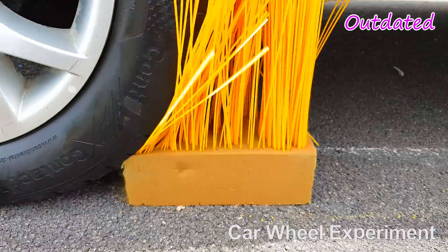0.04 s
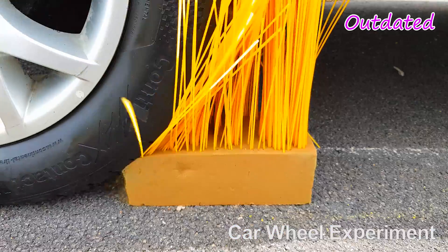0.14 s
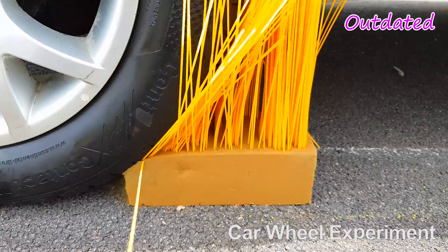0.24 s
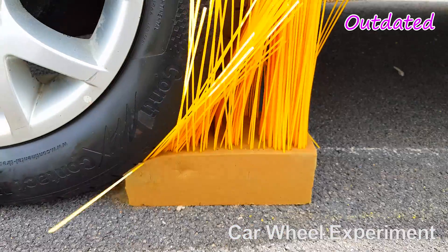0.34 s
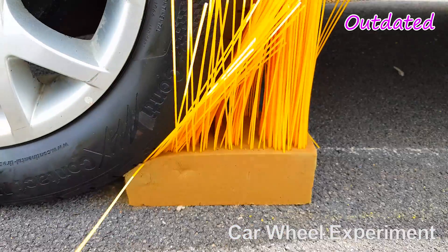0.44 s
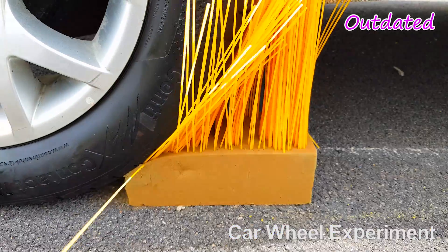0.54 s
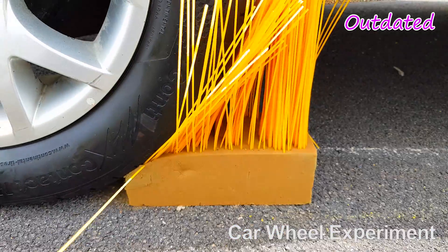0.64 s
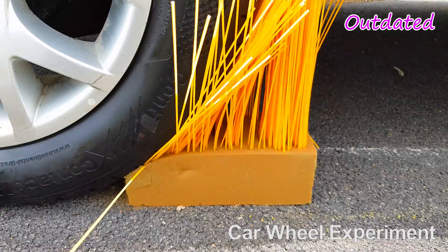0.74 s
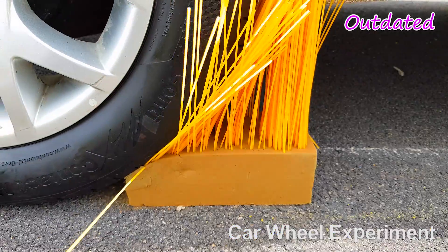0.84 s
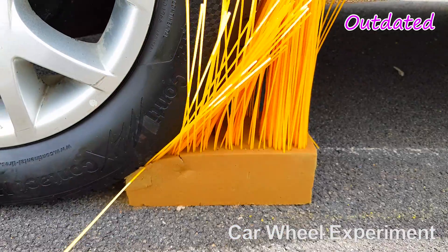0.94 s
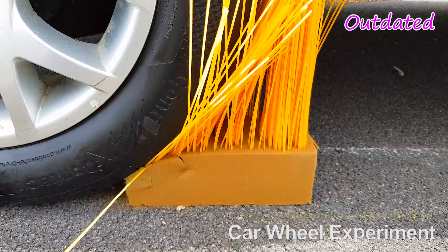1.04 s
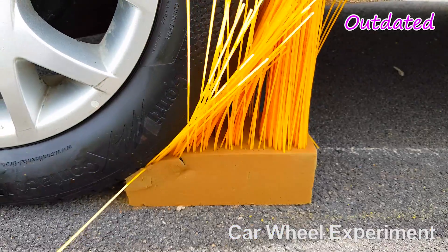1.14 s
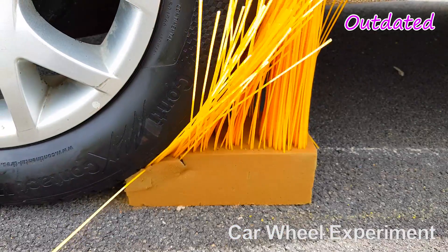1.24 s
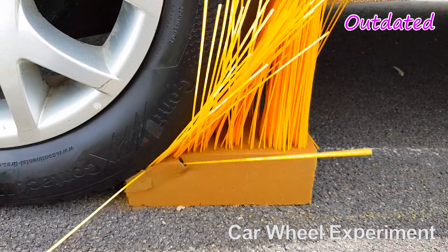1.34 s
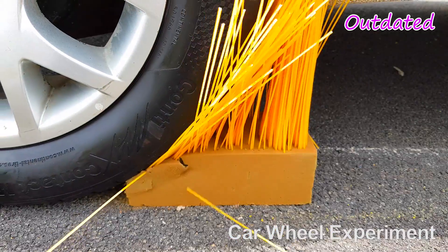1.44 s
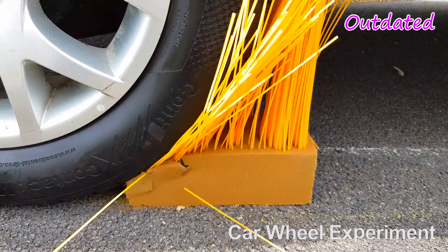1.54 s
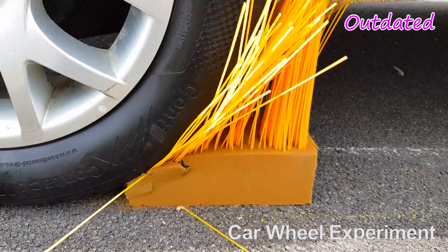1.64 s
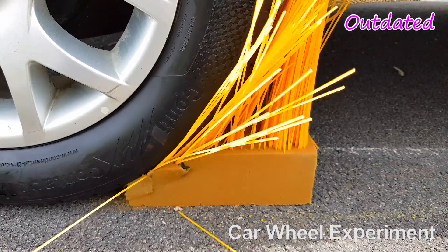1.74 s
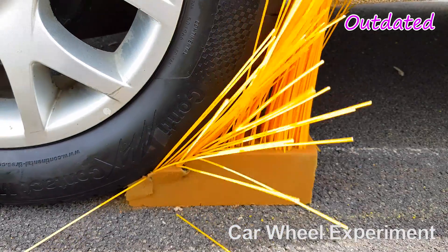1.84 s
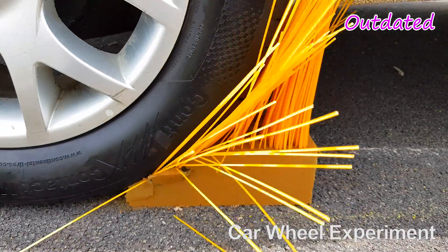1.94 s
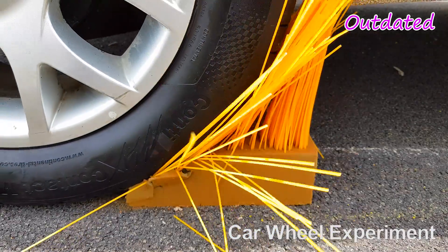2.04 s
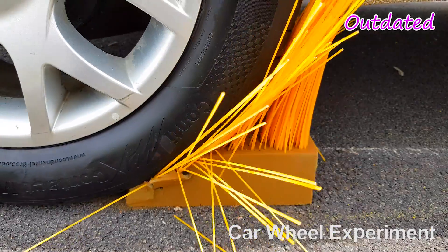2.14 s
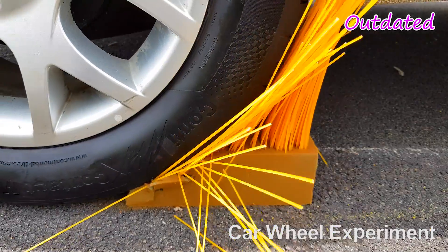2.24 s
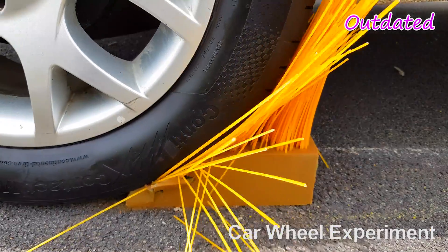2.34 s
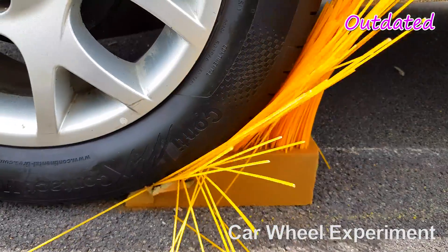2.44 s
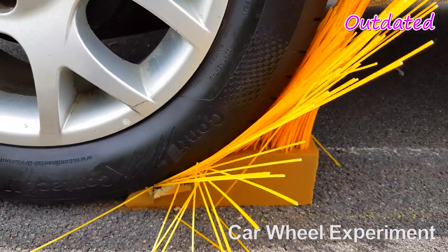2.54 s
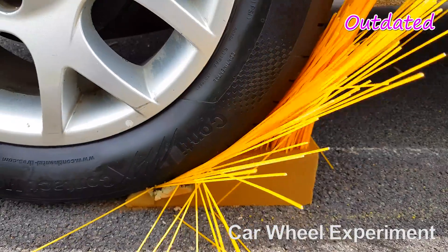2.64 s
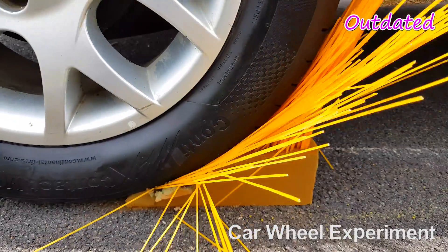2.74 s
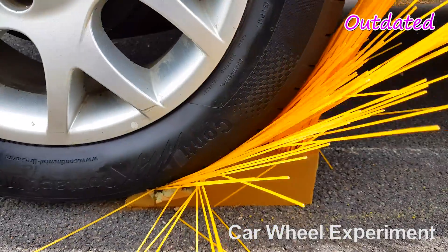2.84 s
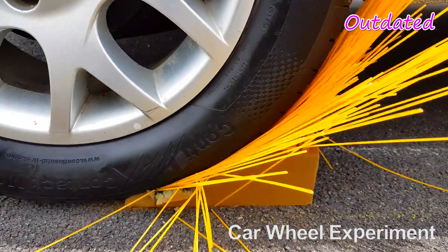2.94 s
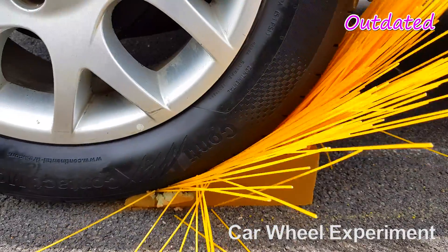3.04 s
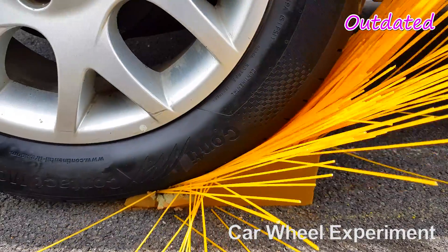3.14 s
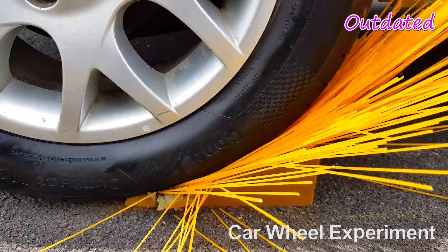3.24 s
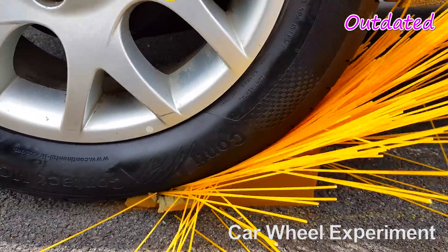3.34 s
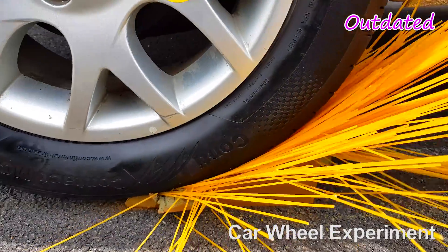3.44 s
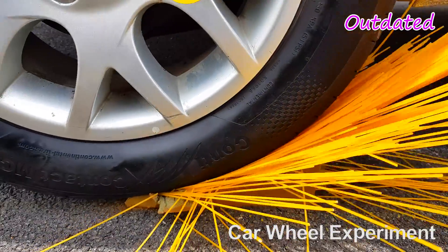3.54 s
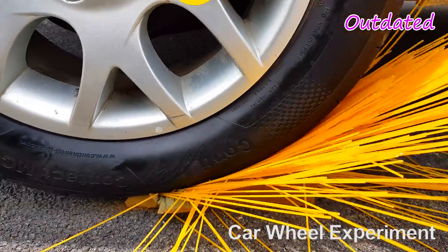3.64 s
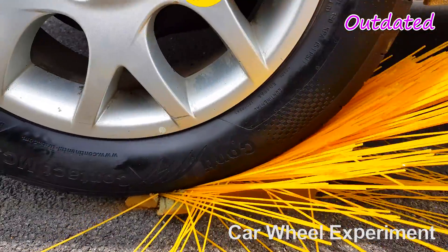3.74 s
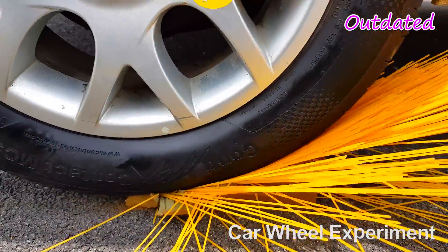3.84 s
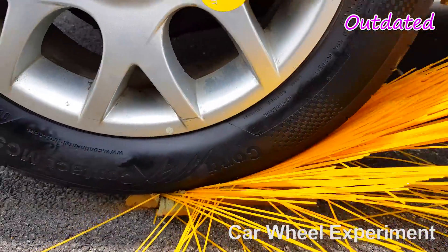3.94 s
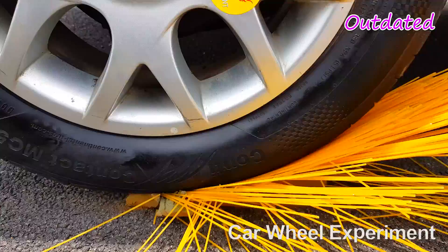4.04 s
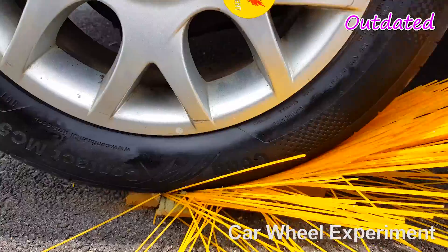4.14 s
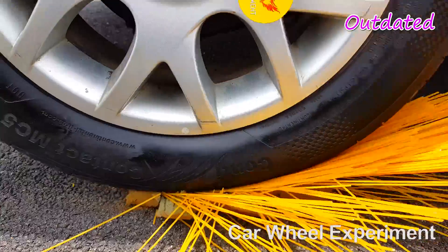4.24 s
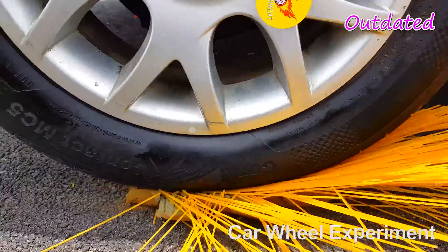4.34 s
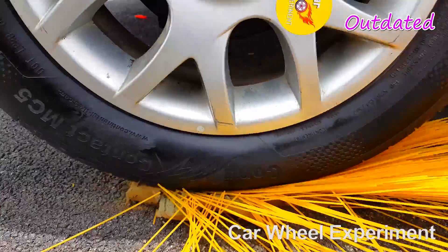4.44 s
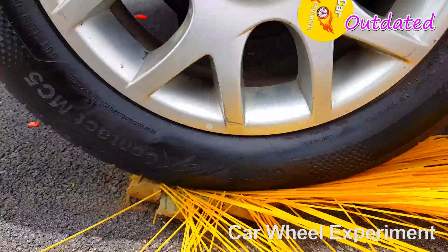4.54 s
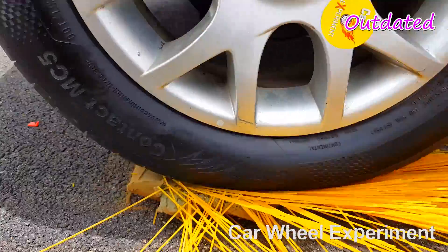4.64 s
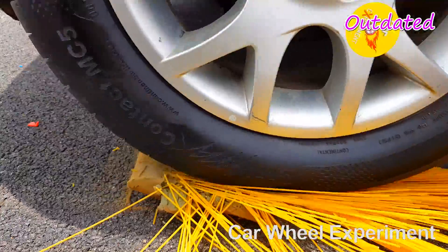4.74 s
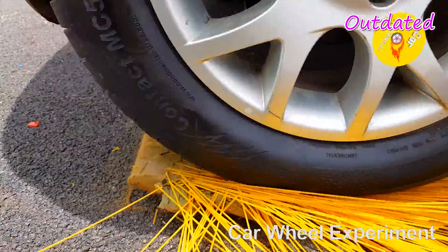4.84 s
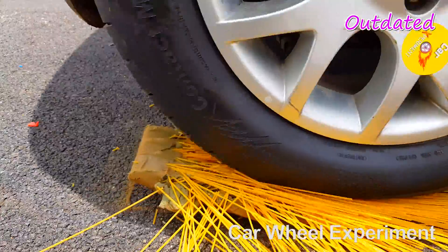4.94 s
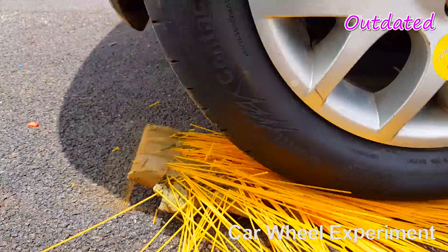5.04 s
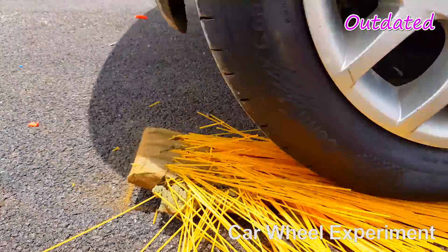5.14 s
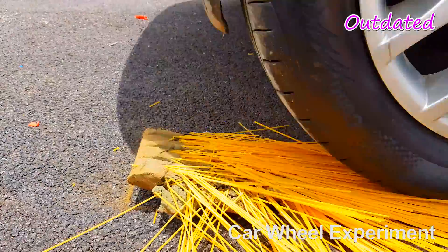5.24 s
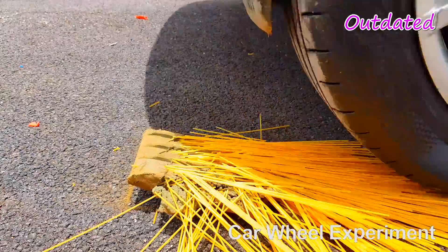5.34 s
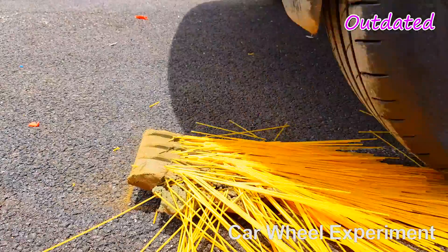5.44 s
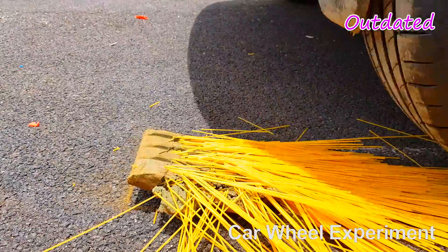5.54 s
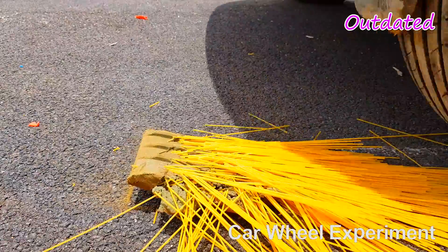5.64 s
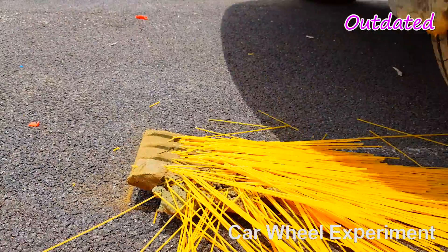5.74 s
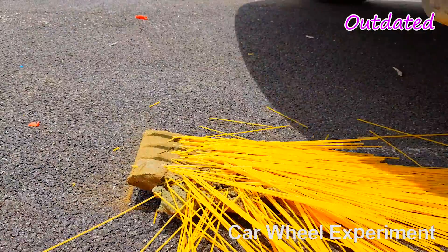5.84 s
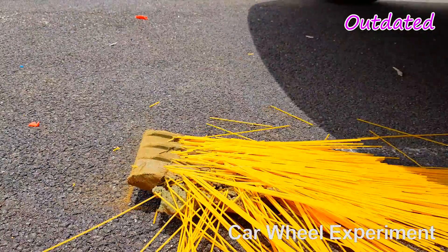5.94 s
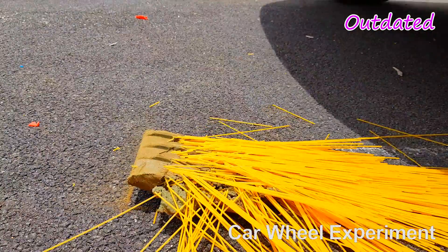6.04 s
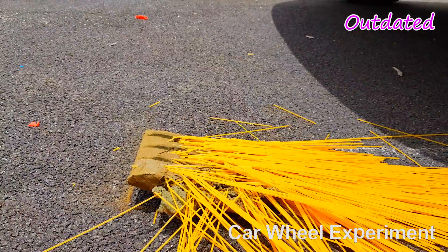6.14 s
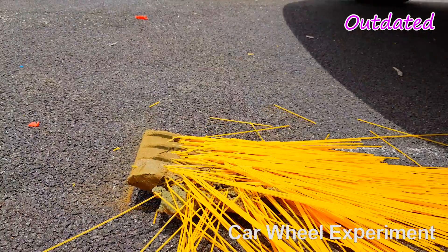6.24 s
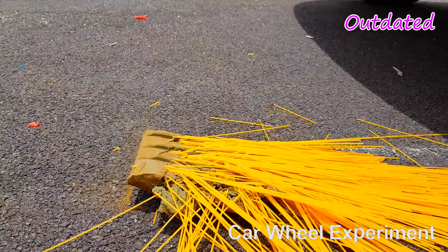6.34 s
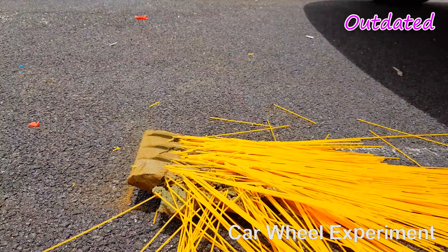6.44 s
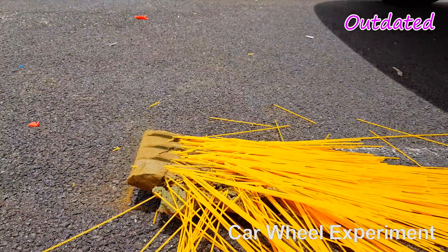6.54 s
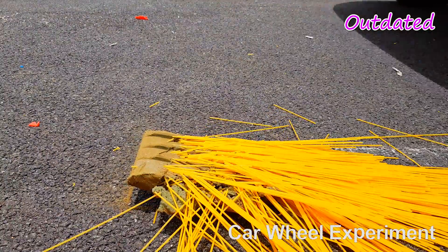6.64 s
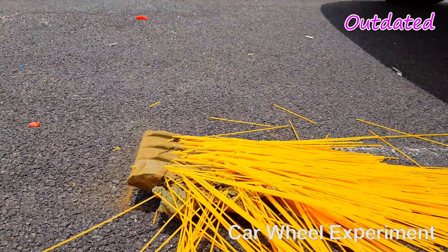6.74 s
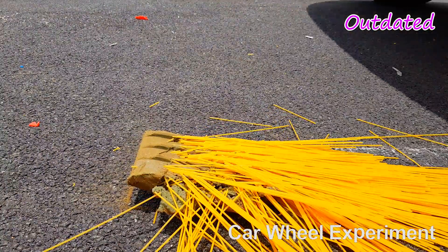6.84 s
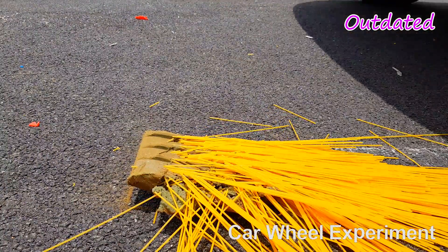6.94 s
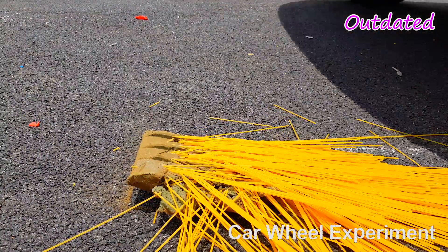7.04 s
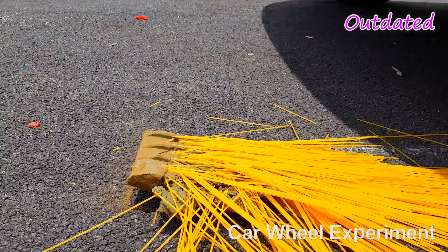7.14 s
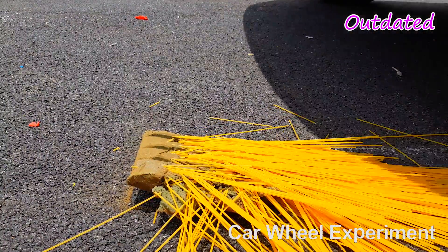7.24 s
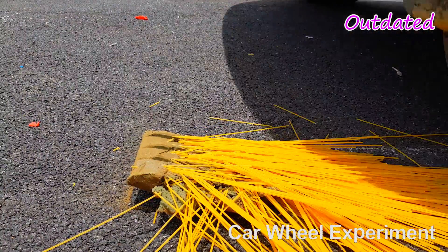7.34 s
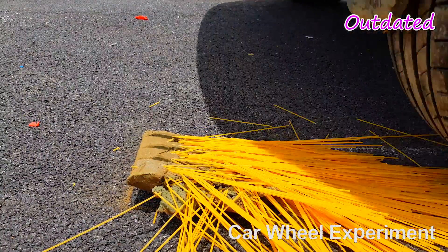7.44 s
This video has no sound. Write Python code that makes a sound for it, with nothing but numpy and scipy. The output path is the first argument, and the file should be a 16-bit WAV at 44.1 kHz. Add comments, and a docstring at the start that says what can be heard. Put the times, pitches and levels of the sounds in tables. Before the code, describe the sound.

Dry spaghetti stuck in a foam block breaks under a slowly rolling car tyre, close to the microphone on outdoor asphalt. Sharp single snaps stand out over a dense crackle for about five seconds. The foam then collapses in a quick cluster of dull crunches and thuds. Afterwards a faint idling engine and tyre hiss fade nearly to silence, with light wind puffs, then return with soft grinding and a few grit ticks.

```python
"""Dry spaghetti stuck in a foam block snaps under a slowly rolling car tyre, on asphalt near the microphone.
Single sticks crack and ring over a dense crackle of tiny fractures. The foam crunches and thuds
as it is flattened, and the tyre rolls off. Behind it the engine idles and the tread hisses; the car
sound drops to near silence, then comes back abruptly with grinding and grit ticks. A low fluttering
drone starts abruptly and fades, twice. Light wind puffs on the two microphone ports."""
import sys
import numpy as np
from scipy import signal
from scipy.fft import rfft, irfft, next_fast_len
from scipy.io import wavfile
from scipy.ndimage import uniform_filter1d, map_coordinates

SR = 44100
rng = np.random.default_rng(int(sys.argv[2]) if len(sys.argv) > 2 else 0)


def file_out(sig):
    """Save sig as 16-bit WAV at sys.argv[1]."""
    # one column per channel
    cols = np.atleast_2d(sig).T
    # limit, then scale
    lim = np.clip(cols, -1, 1)
    pcm = np.round(lim * 32767).astype(np.int16)
    wavfile.write(sys.argv[1], SR, pcm)


N = 329868
TIME = np.arange(N) / SR
ROLL_OFF_S = 5.286  # tyre leaves the block
RESUME_S, RESUME_RISE_S = 6.71, 0.023  # car sound comes back abruptly


def amp(db):
    """Decibels to gain."""
    return np.exp(np.asarray(db) * (np.log(10) / 20))


def unit(x):
    """Scale to rms 1."""
    return x / np.sqrt(np.mean(x ** 2) + 1e-20)


def along(points, hz):
    """Interpolate (f/Hz, value) rows on a log axis."""
    f, values = np.transpose(points)
    return np.interp(np.log(hz + 1), np.log(f + 1), values)


def curve(points):
    """Interpolate (t/s, value) rows at every sample."""
    return np.interp(TIME, *np.transpose(points))


def since(start_s):
    """Seconds after start_s, 0 before."""
    return np.maximum(TIME - start_s, 0)


def ramp(start_s, length_s):
    """Linear rise from 0 to 1."""
    return np.minimum(since(start_s) / length_s, 1)


def wobble(knots_per_s):
    """Smooth random curve."""
    return map_coordinates(rng.standard_normal(2048), [TIME * knots_per_s], mode="wrap")


def add(track, start_s, sound):
    """Mix a short sound into a stereo track."""
    part = track[:, max(round(start_s * SR), 0):][:, :sound.shape[1]]
    part += sound[:, :part.shape[1]]


def filtered(x, response):
    """Apply a frequency response."""
    n = x.shape[-1]
    size = next_fast_len(n + n // 8, True)
    return irfft(rfft(x, size) * response(np.fft.rfftfreq(size, 1 / SR)), size)[..., :n]


def resonance(f, hz, q):
    """Causal band-pass response."""
    return 1j * f * hz / q / (hz * hz - f * f + 1j * f * hz / q)


def coloured(x, spectrum, size=4096):
    """Minimum-phase filter from (f/Hz, level/dB) rows."""
    cepstrum = irfft(np.log(amp(along(spectrum, np.fft.rfftfreq(size, 1 / SR)))))
    cepstrum[1:size // 2] *= 2
    cepstrum[size // 2 + 1:] = 0
    impulse = irfft(np.exp(rfft(cepstrum)))
    return signal.oaconvolve(x, impulse[None], axes=1)[:, :N]


def patchy(x, depth_db):
    """Random gain drift over frequency and time; rms 1."""
    bins = signal.stft(x, nperseg=512)[2]
    drift = uniform_filter1d(rng.standard_normal(bins.shape[1:]), 3, axis=0)
    drift = unit(uniform_filter1d(drift, 7, axis=1))
    return unit(signal.istft(bins * amp(depth_db * drift), nperseg=512)[1][:, :N])


# left-right likeness: f/Hz, correlation
COHERENCE = [(100, 0.67), (400, 0.9), (700, 0.62), (1200, 0.41), (3000, 0.24), (6000, 0.024), (12000, 0.03)]


def mid_and_side(f):
    """Gains of the shared and opposed parts of a stereo sound."""
    alike = along(COHERENCE, f)
    return np.sqrt(np.array([1 + alike, 1 - alike]) / 2)


def spread(pair):
    """Two unrelated signals to stereo: alike in the bass, apart in the treble."""
    mid, side = np.moveaxis(filtered(pair, mid_and_side), -2, 0)
    return np.stack([mid + side, mid - side], axis=-2)


def noise(spectrum):
    """Stereo noise of rms 1 from (f/Hz, level/dB) rows."""
    size = next_fast_len(N, True)
    f = np.fft.rfftfreq(size, 1 / SR)
    real, imaginary = rng.standard_normal((2, 2, len(f)))
    bins = (real + 1j * imaginary) * amp(along(spectrum, f)) * mid_and_side(f)
    mid, side = irfft(bins, size)[:, :N]
    return unit(np.array([mid + side, mid - side]))


def cracks(hz, q, t60_s, rattle_db, rattle_t60_s, click_db=-20, size=1280):
    """One fracture of energy 1 per pitch: click and tearing ring the piece, neighbours rattle in fits."""
    t = np.arange(size) / SR
    fits_db = 4 * np.tanh(np.repeat(rng.standard_normal((len(hz), 1, size // 64)), 64, axis=2))
    decay = amp(-60 * t / t60_s) + amp(rattle_db + fits_db - 60 * t / rattle_t60_s)
    attack = 1 - np.exp(-t / 0.0003)
    burst = spread(rng.standard_normal((len(hz), 2, size))) * decay * attack
    burst /= np.linalg.norm(burst, axis=2, keepdims=True)
    burst[:, :, 12] += amp(click_db + rng.normal(0, 2, (len(hz), 2)))
    ring = filtered(burst, lambda f: resonance(f, hz[:, None, None], q) ** 2)
    return ring / np.sqrt(np.mean(np.sum(ring ** 2, axis=2), axis=1))[:, None, None]


def fractures(per_s, scatter_db):
    """Random (t/s, gain) rows: many small breaks, a few larger."""
    waits, sizes = rng.exponential(size=(12000, 2)).T
    excess_db = np.minimum(scatter_db * sizes, 13)
    rows = np.column_stack([np.cumsum(waits) / per_s, amp(excess_db)])
    return rows[rows[:, 0] < N / SR]


def crackle(breaks, spectrum, centre_hz, t60_s, haze_db, click_db=-20, rattle_db=-12):
    """Tiny fractures in pieces of many lengths, the smallest merging into a haze; rms 1."""
    hz = centre_hz * np.exp(np.linspace(-0.6, 0.6, 120))
    pieces = cracks(hz, q=1.21, t60_s=t60_s, rattle_db=rattle_db, rattle_t60_s=0.028,
                    click_db=click_db, size=640)
    out = np.zeros((2, N))
    for (start_s, gain), piece in zip(breaks, rng.integers(len(hz), size=12000)):
        add(out, start_s, gain * pieces[piece])
    haze = amp(haze_db) * noise(spectrum)
    return unit(unit(coloured(out, spectrum)) + haze)


# drone onsets: t/s, level/dB, fade/(dB/s)
DRONE_ONSETS = [(0, -50, 13), (6.73, -50.5, 15.5)]
# drone spectrum: f/Hz, level/dB
DRONE_SPECTRUM = [(40, -23.5), (120, -30), (180, 2.5), (240, -5), (330, -1), (600, -29.5)]


def low_drone(attack_s=0.03):
    """A low fluttering drone near 180 Hz starts abruptly and fades, twice."""
    flutter_db = 5 * np.tanh(wobble(17))
    envelope = sum(ramp(s, attack_s) * amp(db - fade * since(s)) for s, db, fade in DRONE_ONSETS)
    return envelope * amp(flutter_db) * noise(DRONE_SPECTRUM)


# wind puffs: t/s, level/dB, half-length/s, f/Hz, left over right/dB
PUFFS = [(3.572, -59, 0.027, 185, 2), (4.456, -63.5, 0.2, 56, 3), (5.254, -59.5, 0.043, 52.4, 17),
         (5.6, -47, 0.045, 79, 4), (5.682, -35.5, 0.015, 217, -19), (5.723, -41.5, 0.031, 171, -10),
         (5.911, -49.5, 0.051, 119, -11), (6.039, -55.5, 0.054, 247, -27), (6.107, -44, 0.057, 343, -16.5),
         (6.101, -45.5, 0.047, 101, -7), (6.442, -61, 0.025, 422, 2), (6.601, -53.5, 0.032, 100, -2),
         (6.92, -51.5, 0.024, 200, 5), (7.205, -40.5, 0.019, 139, -1)]


def puffs():
    """Single eddies hit the ports unevenly."""
    t = np.arange(-SR // 8, SR // 8) / SR
    out = np.zeros((2, N))
    for peak_s, db, half_s, hz, pan_db in PUFFS:
        white = spread(rng.standard_normal((2, len(t))))
        eddy = filtered(white, lambda f: resonance(f, hz, q=1) ** 2 / (1 + (f / 640) ** 12))
        puff = eddy * np.exp(-(t / half_s) ** 2)
        puff *= np.sqrt(half_s * SR / np.mean(np.sum(puff ** 2, axis=1)))
        add(out, peak_s + t[0], amp(db + np.array([[pan_db], [-pan_db]]) / 2) * puff)
    return out


def car_level_db(passing_db, fade_db_per_s, quiet_db, resume_db, quiet_s=6.14, settle_s=6.45):
    """A car sound holds steady, fades, drops to near silence, then comes back abruptly."""
    drop_db = quiet_db * ramp(quiet_s, 0.11) - fade_db_per_s * since(ROLL_OFF_S)
    drop_db -= 61 * since(settle_s)
    resumed = ramp(RESUME_S, RESUME_RISE_S)
    return passing_db + (1 - resumed) * drop_db + resumed * resume_db


# engine spectra: f/Hz, level/dB
RUMBLE_SPECTRUM = [(20, -4), (40, 7.5), (65, 2), (84, 12.5), (105, 4), (250, -19), (500, -44.5)]
HUM_SPECTRUM = [(110, -48.5), (170, -8.5), (200, -1), (260, -17.5), (400, -62)]
WHIR_SPECTRUM = [(200, -51), (315, -20.5), (385, 1), (490, -0.5), (545, 5), (620, -17.5), (710, -22),
                 (780, -9), (860, -1.5), (1020, -22), (1150, -22), (1240, -5.5), (1800, -24.5),
                 (2100, -29.5), (4000, -54.5)]


def engine_idle(throb_hz=7.14, hum_fade_db_per_s=2):
    """The idling engine rumbles and whirs; its hum swells once a cycle."""
    rumble = amp(-72) * noise(RUMBLE_SPECTRUM)
    throb_db = 4.5 * np.cos(2 * np.pi * throb_hz * (TIME - 0.04))
    screened_db = -10.5 * ramp(2.58, 0.14)  # tyre comes between engine and microphone
    hum = amp(-64 - hum_fade_db_per_s * TIME + throb_db + screened_db) * noise(HUM_SPECTRUM)
    whir_db = car_level_db(-52.5, fade_db_per_s=6, quiet_db=-7.5, resume_db=5)
    return rumble + hum + amp(whir_db) * noise(WHIR_SPECTRUM)


# knock of each cylinder: level/dB
CYLINDERS_DB = [-0.5, -1.5, -5, -3.5]
# firing spectra: f/Hz, level/dB
CLATTER_SPECTRUM = [(700, -27), (850, 8), (1050, -3.5), (1250, 6), (1600, -1.5), (2000, 2.5), (2900, -4.5),
                    (3700, -12.5), (4500, -18.5), (5200, -28)]
INJECTOR_SPECTRUM = [(1100, -21), (1700, 5), (2300, -27), (3200, -16), (4300, -3.5), (4600, 1), (4950, -37)]


def engine_firings(tick_db, firing_hz=29.46, fall_db=14):
    """At each firing one of four unequal cylinders knocks and an injector ticks."""
    firing, phase = np.divmod((TIME - 6.804) * firing_hz, 1)
    beat = unit(amp(-fall_db * phase) * (1 - np.exp(-phase / 0.11)))
    knocks = unit(beat * amp(CYLINDERS_DB)[firing.astype(int) % len(CYLINDERS_DB)])
    grain = unit(amp(1.5 * wobble(500)) * patchy(noise(CLATTER_SPECTRUM), depth_db=3.5))
    clatter_db = car_level_db(-44, fade_db_per_s=22.5, quiet_db=-18, resume_db=-6)
    screened_db = -15 * (1 - ramp(ROLL_OFF_S - 1, 1))  # until the tyre has rolled past
    clatter = amp(clatter_db + screened_db) * knocks * grain
    return clatter + amp(tick_db) * beat * noise(INJECTOR_SPECTRUM)


# tread spectra: f/Hz, level/dB
HISS_SPECTRUM = [(600, -21.5), (1400, -6), (2200, -15.5), (3300, -3.5), (4500, -9), (5200, -17.5),
                 (6800, -7.5), (8000, -13), (12000, -10.5), (12800, -19.5), (16000, -27.5)]
GRIND_SPECTRUM = [(170, -30), (230, -5.5), (320, 3.5), (560, 4), (680, -3.5), (850, -1), (1050, -14),
                  (1700, -13), (1950, 0.5), (2200, -16), (3000, -23), (5000, -42.5)]


def tread(hiss_db, grind_db=-50.5):
    """Rubber hisses on asphalt; grinding joins when the car sound comes back."""
    hiss = amp(hiss_db) * noise(HISS_SPECTRUM)
    grind = unit(amp(5.5 * wobble(70)) * noise(GRIND_SPECTRUM))
    return hiss + amp(grind_db) * ramp(RESUME_S, RESUME_RISE_S) * grind


# stone ticks: t/s, level/dB, f/Hz
GRIT = [(6.997, -32, 2090), (6.998, -39.5, 6150), (7.115, -42, 7930)]


def grit():
    """Small stones tick under the tread."""
    times_s, levels_db, hz = np.transpose(GRIT)
    ticks = cracks(hz, q=1.7, t60_s=0.012, rattle_db=-9, rattle_t60_s=0.038)
    out = np.zeros((2, N))
    for start_s, db, tick in zip(times_s, levels_db, ticks):
        add(out, start_s, amp(db + 15) * tick)
    return out


def car(end_fade_s=7.2, end_fade_db_per_s=36):
    """Engine, tread and grit; hiss and injector ticks fade at the end."""
    hiss_db = car_level_db(-53.5, fade_db_per_s=8, quiet_db=-17.5, resume_db=-7.5)
    hiss_db -= end_fade_db_per_s * since(end_fade_s)
    return engine_idle() + engine_firings(tick_db=0.51 * hiss_db - 31) + tread(hiss_db) + grit()


# reflection decay: f/Hz, t60/s
STREET_DECAY = [(300, 0.19), (2500, 0.032), (12000, 0.091)]


def reflections(x, delay_samples=200):
    """Car body and ground scatter a short tail."""
    hz, t, bins = signal.stft(rng.standard_normal((2, 8192)), SR, nperseg=256)
    decay = amp(-60 * t / along(STREET_DECAY, hz)[:, None])
    tail = signal.istft(bins * decay, SR, nperseg=256)[1]
    tail = np.pad(tail / np.linalg.norm(tail[0]), ((0, 0), (delay_samples, 0)))
    return signal.oaconvolve(x, tail, axes=1)[:, :N]


# port imbalance: f/Hz, left over right/dB
PORT_BALANCE = [(60, -2.5), (99, 1.0), (160, -1), (270, 1), (450, -2), (740, 1), (1220, 0), (2010, 3),
                (3330, -4.5), (5500, -4.5), (9080, 5.5), (15000, -3.5)]


def port_gains(f):
    """Each microphone port colours the sound differently."""
    return amp(along(PORT_BALANCE, f) * np.array([[0.5], [-0.5]]))


# wheel bearing, left to right: t/s, left port lag/ms
PORT_LAG = [(0, -0.069), (4.8, -0.014), (5.6, 0.28), (7.48, 0.37)]


def passing(x):
    """Sound reaches the nearer port first."""
    lag_samples = curve(PORT_LAG) * SR / 1000
    return np.array([map_coordinates(port, [np.arange(N) + side * lag_samples / 2])
                     for port, side in zip(x, (-1, 1))])


# block modes: f/Hz, level/dB, t60/s
BLOCK_MODES = [(383, -26, 0.012), (510, 2, 0.033), (670, -20, 0.021), (840, 6.5, 0.012), (1010, -4, .012),
               (1280, -12, 0.011)]
# blows: t/s, level/dB, bass tilt/(dB/octave)
THUDS = [(4.898, -42, 0), (4.9408, -18, -7), (4.976, -32, 7), (5, -27, 12), (5.0146, -28, 13.5),
         (5.085, -39, 14), (5.1665, -25.5, -9), (5.209, -21.5, -6)]


def thuds(pivot_hz=840):
    """The damped block rings as it folds onto the asphalt and as the tyre lets go."""
    t = np.arange(SR // 12) / SR
    attack = 1 - np.exp(-t / 0.00072)
    out = np.zeros((2, N))
    for start_s, db, tilt in THUDS:
        ring = np.zeros((1, len(t)))
        for hz, mode_db, t60_s in BLOCK_MODES:
            struck_db = mode_db + tilt * np.log2(pivot_hz / hz) + rng.normal(0, 1.2)
            detuned_hz = hz * rng.normal(1, 0.049)
            ring += amp(struck_db - 60 * t / t60_s) * np.sin(2 * np.pi * detuned_hz * t)
        add(out, start_s, amp(db) * ring * attack)
    return out


# fracture spectra: f/Hz, level/dB
STICK_SPECTRUM = [(250, -51), (420, -24), (860, -3), (1020, -3.5), (1270, 4), (1700, -3.5), (2400, 0),
                  (3200, -1), (4300, 0.5), (5800, -5.5), (7500, -6.5), (16000, -25.5)]
SPLINTER_SPECTRUM = [(2500, -30.5), (6200, -9.5), (8600, -2.5), (9500, -2), (12000, 0), (13000, -4.5),
                     (16000, -9.5)]
FOAM_SPECTRUM = [(200, -55), (300, -34.5), (400, -3), (520, -6), (690, -8.5), (840, 1.5), (1050, -9),
                 (1280, -8.5), (2000, -13), (6000, -22.5)]
# push of the tread: t/s, level/dB
PUSH = [(0, -28), (.2, -32), (.27, -35.5), (.385, -32.5), (.41, -51.5), (.46, -40.5), (.51, -47.5),
        (.55, -33.5), (.68, -41), (.8, -41.5), (.94, -49), (1.19, -45), (1.34, -47), (1.44, -35),
        (1.53, -47), (1.7, -42.5), (1.81, -42.5), (1.87, -39), (2.1, -37.5), (2.3, -44.5), (2.45, -37.5),
        (2.55, -40), (2.8, -41.5), (2.92, -40), (3.08, -36.5), (3.4, -37.5), (3.66, -40.5), (3.85, -32),
        (3.94, -41.5), (4.15, -37), (4.32, -38), (4.39, -40.5), (4.48, -36.5), (4.59, -43.5), (4.86, -40),
        (5.15, -45.5)]


def crushing(even_push_db=-38.5):
    """Sticks splinter and foam cells break in clumps under the tread; freed foam crackles on briefly."""
    push_db = curve(PUSH) - even_push_db
    clumps_db = 1.2 * np.tanh(wobble(45))
    breaks = fractures(per_s=380, scatter_db=5)
    sticks = crackle(breaks, STICK_SPECTRUM, centre_hz=2740, t60_s=0.00067, haze_db=-3.5,
                     click_db=0, rattle_db=-19)
    splinters = crackle(breaks, SPLINTER_SPECTRUM, centre_hz=9200, t60_s=0.0011, haze_db=-4)
    cells = fractures(per_s=400, scatter_db=1)
    foam = crackle(cells, FOAM_SPECTRUM, centre_hz=726, t60_s=0.01, haze_db=-0.5)
    pasta = amp(-36 + push_db) * sticks + amp(-39 + 0.77 * push_db) * splinters
    freed_s = since(ROLL_OFF_S)
    foam_db = -44 + 0.62 * push_db - 26.5 * freed_s
    return amp(clumps_db) * (amp(-113 * freed_s) * pasta + amp(foam_db) * foam)


# foam cells caving in together: t/s, level/dB, rise/s, length/s
COLLAPSES = [(4.857, -28.5, 0.0071, 0.1), (4.888, -16.5, 0.014, 0.068), (4.915, -17, .008, .07),
             (4.961, -12, .012, 0.042), (4.998, -13.5, 0.0045, .055), (5.014, -15.5, .004, .042),
             (5.023, -18.5, .002, 0.026), (5.076, -26, .008, .045), (5.117, -15.5, 0.014, .05),
             (5.214, -23, 0.0035, 0.025)]


def collapses(fall_db=29):
    """The block's far end gives way in dull crunches, splintering the stubs inside."""
    force = np.zeros(N)
    t = np.arange(SR // 4) / SR
    for start_s, db, rise_s, length_s in COLLAPSES:
        crunch = amp(db - fall_db * t / length_s) * (1 - np.exp(-t / rise_s))
        part = force[round(start_s * SR):][:len(t)]
        part[:] = np.maximum(part, crunch)
    cells = fractures(per_s=700, scatter_db=1)
    foam = crackle(cells, FOAM_SPECTRUM, centre_hz=540, t60_s=0.0034, haze_db=2.5)
    stubs = crackle(cells, SPLINTER_SPECTRUM, centre_hz=9000, t60_s=0.0011, haze_db=-22)
    return force * (amp(-3.5) * foam + amp(-9.5) * stubs)


# woody body and sheen of a snap: f/Hz, level/dB
SNAP_SPECTRUM = [(2000, 0.5), (4400, 2), (5400, -1), (6600, -3), (8400, -1.5), (12300, -3), (15500, -7)]
# loudest stick breaks: t/s, level/dB, f/Hz, relative splinter level/dB
SNAPS = [(0.0034, -12.5, 1680, -3), (0.0209, -14.5, 1540, -13.5), (0.046, -18, 1600, -6.5),
         (0.0738, -20, 1600, -3), (0.09, -15.5, 3810, -11), (0.1016, -17, 2530, -1),
         (0.1126, -12, 2400, -13), (0.1202, -17.5, 2000, -9.5), (0.1485, -12, 2910, -11),
         (0.1678, -8.5, 2570, -8.5), (0.2008, -14, 1940, -18), (0.2125, -8.5, 2500, -12),
         (0.2806, -15.5, 2020, -9), (0.292, -17, 2360, -9), (0.318, -12, 2900, -17), (0.34, -13, 1390, -14),
         (0.3757, -13, 1360, -23), (0.3879, -12.5, 2470, -11.5), (0.4291, -10.5, 2420, -27.5),
         (0.436, -13, 2400, -17), (0.4499, -14.5, 1270, -22.5), (0.475, -15.5, 1300, -12.5),
         (0.484, -15, 1340, -15), (0.5183, -20.5, 1500, -12), (0.527, -18.5, 1320, -9),
         (0.5355, -16, 2556, -12), (0.562, -14, 1460, -9), (0.572, -10.5, 3600, -14.5),
         (0.62, -26.5, 2220, -11.5), (0.628, -12, 2350, -13.5), (0.6365, -17.5, 2390, -16),
         (0.6589, -16, 4300, -11.5), (0.7094, -16.5, 2560, -8), (0.7348, -18, 4100, -9.5),
         (0.755, -17, 2620, -12), (0.7913, -20, 3030, -15), (0.812, -12, 2660, -11.5),
         (0.836, -22.5, 3350, -4.5), (0.8753, -10, 2810, -19), (1.067, -23, 1760, -4.5),
         (1.142, -27.5, 1240, -6), (1.2108, -26, 2920, -4.5), (1.2451, -11, 2600, -16),
         (1.2547, -12, 4100, -15), (1.272, -11.5, 3080, -22.5), (1.3351, -21.5, 2400, -11),
         (1.3722, -19.5, 2400, -16), (1.406, -29.5, 1110, -4), (1.4305, -19.5, 2560, -5),
         (1.4404, -25.5, 2400, -2), (1.5379, -8.5, 4250, -23.5), (1.575, -10.5, 2780, -14.5),
         (1.6447, -28, 1940, -3), (1.7534, -13.5, 3800, -10.5), (1.7706, -13, 2980, -13),
         (1.8336, -13.5, 2040, -12), (1.8444, -11, 3730, -13.5), (1.8547, -18.5, 2550, -9),
         (1.8796, -23.5, 1980, -6.5), (1.8938, -8, 2780, -14), (1.9114, -7.5, 4160, -29),
         (1.923, -4.5, 3620, -19.5), (2.0055, -21, 1010, -13.5), (2.0215, -14, 1960, -14.5),
         (2.075, -15, 2420, -15), (2.0835, -17.5, 2780, -18.5), (2.1061, -13, 2080, -24.5),
         (2.1155, -19, 2060, -23.5), (2.164, -16.5, 2410, -13.5), (2.1797, -23.5, 1920, -5.5),
         (2.2086, -18, 2270, -13), (2.307, -29, 2240, 0), (2.4046, -6, 2460, -15), (2.4389, -14, 2830, -14),
         (2.4631, -8, 2800, -15.5), (2.4781, -12, 2730, -20), (2.5402, -23, 2850, -22),
         (2.5915, -11, 1180, -14), (2.611, -14, 2780, -16), (2.6358, -16, 3800, -21),
         (2.6751, -6, 2440, -16), (2.6934, -21, 2430, -7.5), (2.7414, -15, 3080, -11),
         (2.7787, -8.5, 2430, -13.5), (2.7945, -12.5, 2160, -13), (2.8073, -19, 2060, -10.5),
         (2.8297, -8, 3120, -17), (2.8355, -8, 4200, -15.5), (2.8449, -13, 2170, -14.5),
         (2.8673, -18.5, 2790, -14), (2.884, -21.5, 4800, -2), (2.891, -8.5, 2930, -17),
         (2.9456, -21, 2400, -13), (2.9548, -6, 3030, -19), (2.977, -9, 3900, -17),
         (3.0423, -9, 4100, -11.5), (3.051, -11.5, 2640, -14.5), (3.0627, -19, 2730, -10),
         (3.0744, -9.5, 2610, -12), (3.094, -10, 2780, -13.5), (3.13, -14, 1430, -16),
         (3.1643, -15.5, 2250, -14.5), (3.1961, -3.5, 2820, -23), (3.2268, -16.5, 1840, -18.5),
         (3.259, -14.5, 2900, -13), (3.2938, -8.5, 1310, -24.5), (3.3529, -9, 2080, -22),
         (3.3796, -8, 3200, -22.5), (3.3923, -8, 2480, -23), (3.4688, -17.5, 2980, -24.5),
         (3.5022, -17.5, 2630, -27), (3.5213, -13, 1180, -25.5), (3.5316, -16, 2640, -23.5),
         (3.542, -13.5, 2770, -20), (3.5504, -19, 2730, -14), (3.5773, -17, 1310, -20.5),
         (3.6006, -16, 1250, -21), (3.6791, -14, 1290, -23), (3.6884, -21, 3960, -2),
         (3.706, -10, 4240, -15), (3.7782, -19.5, 3190, -14.5), (3.7868, -21.5, 2720, -15.5),
         (3.8047, -20.5, 2070, -8.5), (3.8322, -20.5, 3820, -23.5), (3.8436, -23, 4870, -21.5),
         (3.8734, -25.5, 3290, -23.5), (3.909, -21.5, 2050, -20.5), (3.9622, -25, 1720, -15),
         (3.9954, -19.5, 2830, -22), (4.0127, -21, 4170, -9.5), (4.0671, -13, 4460, -21.5),
         (4.0859, -16.5, 2100, -24.5), (4.0986, -19.5, 1620, -21.5), (4.1074, -24, 2030, -17),
         (4.184, -17, 2760, -24.5), (4.2116, -18, 2360, -14), (4.2764, -20, 2600, -23),
         (4.295, -17, 3650, -24), (4.334, -16.5, 4200, -18.5), (4.3487, -17.5, 4330, -12.5),
         (4.4223, -19, 3350, -24), (4.4471, -17.5, 3260, -23.5), (4.4722, -13, 3700, -24),
         (4.4866, -12.5, 3850, -13.5), (4.5007, -24, 3400, -12.5), (4.5101, -20.5, 3780, -16.5),
         (4.526, -12.5, 3680, -22.5), (4.5346, -23.5, 3470, -20), (4.5563, -22, 2240, -8.5),
         (4.635, -22, 3730, -10.5), (4.6395, -22.5, 3710, -10.5), (4.6575, -21.5, 3560, -6.5),
         (4.6871, -17, 3360, -7.5), (4.6966, -14.5, 4180, -18), (4.7327, -16.5, 4410, -9),
         (4.7592, -28, 3440, -2), (4.8035, -28, 2040, -12), (4.9965, -20.5, 1150, -5),
         (5.0324, -18, 890, -7), (5.0831, -24.5, 1180, -1.5), (5.249, -30, 1140, 0),
         (5.2838, -32.5, 1070, -3)]


def snaps(pinned_s=3.1, pinning_s=0.32):
    """Each stick cracks at its own pitch, its freed stub swings, it splinters and knocks the block."""
    times_s, db, hz, splinter_db = np.transpose(SNAPS)
    # the tread comes to lie on the sticks and damps them
    pinned = np.clip((times_s - pinned_s) / pinning_s, 0, 1)[:, None, None]
    crack = cracks(hz, q=0.5, t60_s=0.005 * 0.77 ** pinned, rattle_db=-20 - 0.5 * pinned,
                   rattle_t60_s=0.086, click_db=-7.5)
    stub = cracks(hz, q=3.3, t60_s=0.0013, rattle_db=-27, rattle_t60_s=0.039, click_db=-9)
    splinter = cracks(np.full_like(hz, 10000), q=0.78, t60_s=0.0019, rattle_db=-15,
                      rattle_t60_s=0.025, click_db=-8)
    knock = cracks(np.full_like(hz, 850), q=1.4, t60_s=0.016, rattle_db=-9,
                   rattle_t60_s=0.035, click_db=-4.5)
    out = np.zeros((2, N))
    for i, start_s in enumerate(times_s):
        stick = amp(10.5) * crack[i] + amp(7.5) * stub[i] + amp(splinter_db[i] + 25.5) * splinter[i]
        knock_db = -10.5 + 0.3 * db[i]  # soft block: hardly grows with the snap
        add(out, start_s, amp(db[i]) * stick + amp(knock_db) * knock[i])
    return coloured(out, SNAP_SPECTRUM)


def scene():
    """Breaking sticks and foam with their reflections, over car, low drone and wind puffs."""
    breaking = snaps() + crushing() + collapses() + thuds()
    breaking += amp(-13) * reflections(breaking)
    low_cut = lambda f: 1 - 1 / (1 + (f / 330) ** 12)  # small pieces radiate no bass
    breaking = filtered(breaking, lambda f: low_cut(f) * port_gains(f))
    return passing(breaking + car()) + low_drone() + puffs()


def record(dry):
    """Band limit at 16 kHz."""
    return filtered(dry, lambda f: f < 16000)


dry = scene()
out = record(dry)
file_out(out)
```